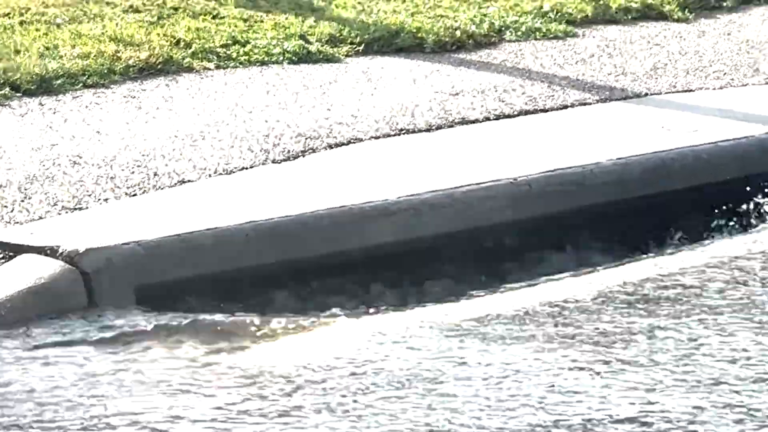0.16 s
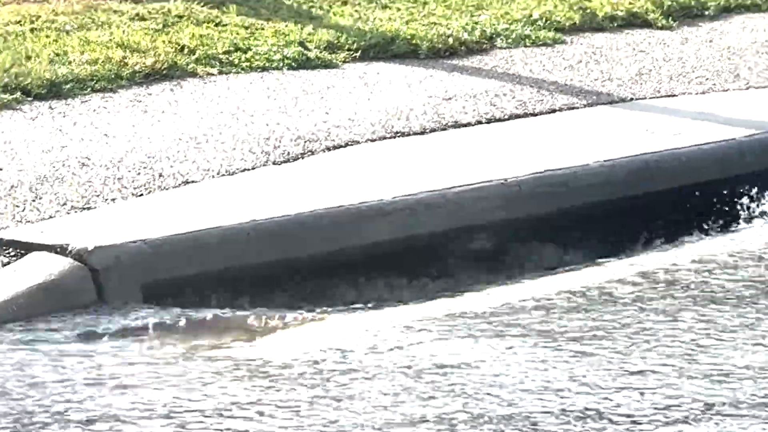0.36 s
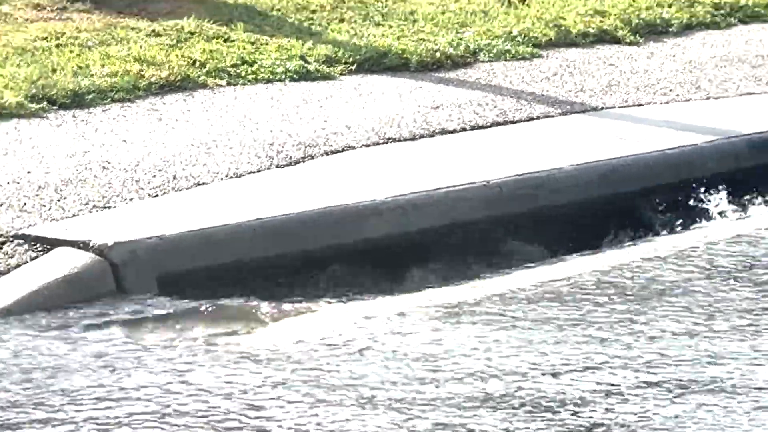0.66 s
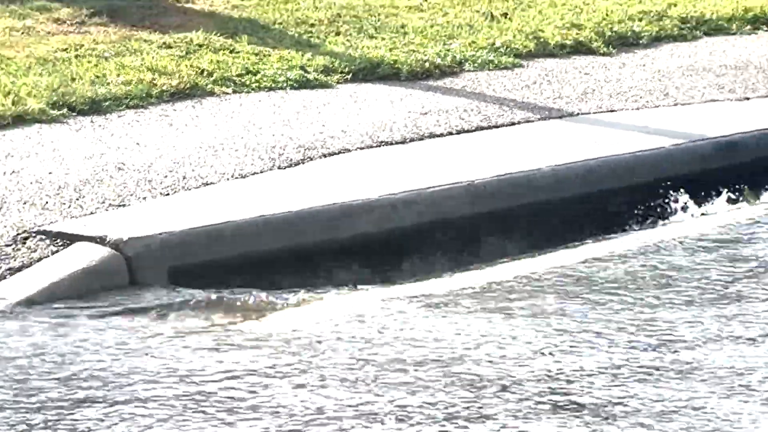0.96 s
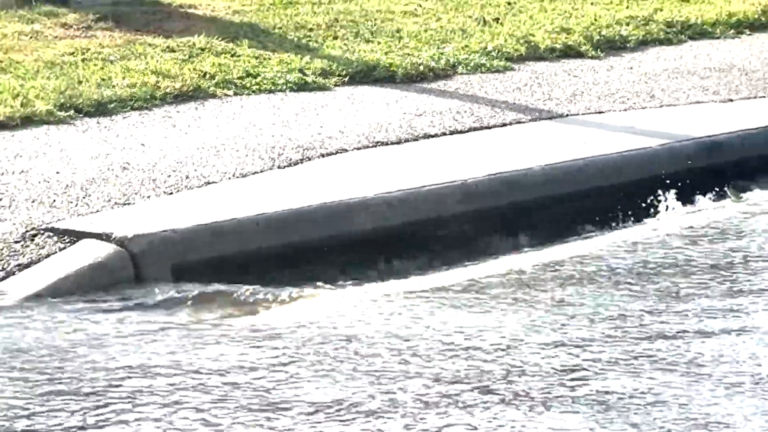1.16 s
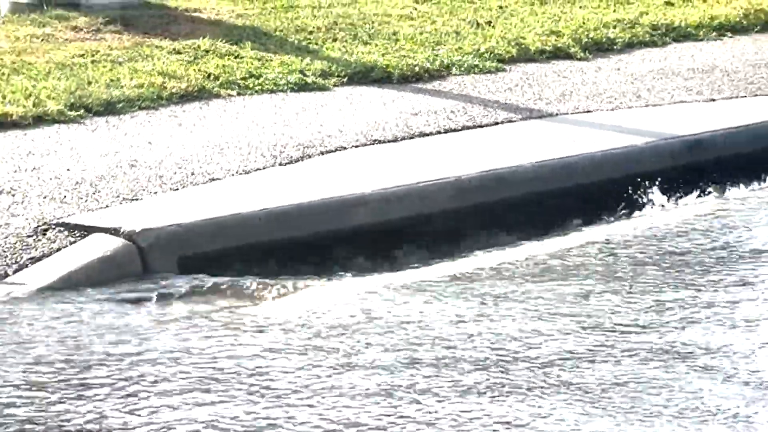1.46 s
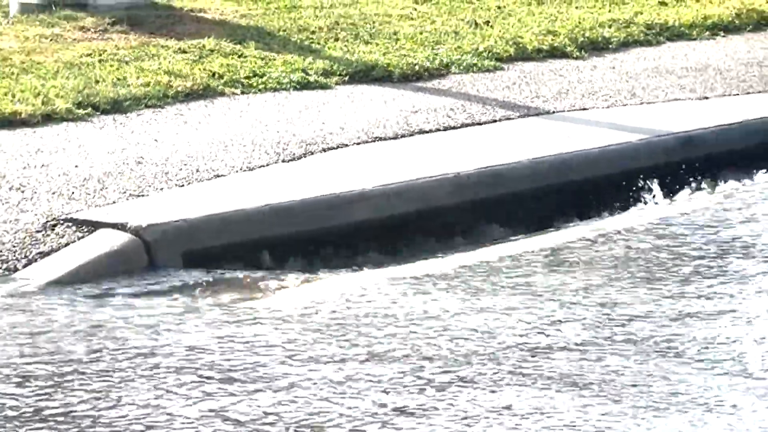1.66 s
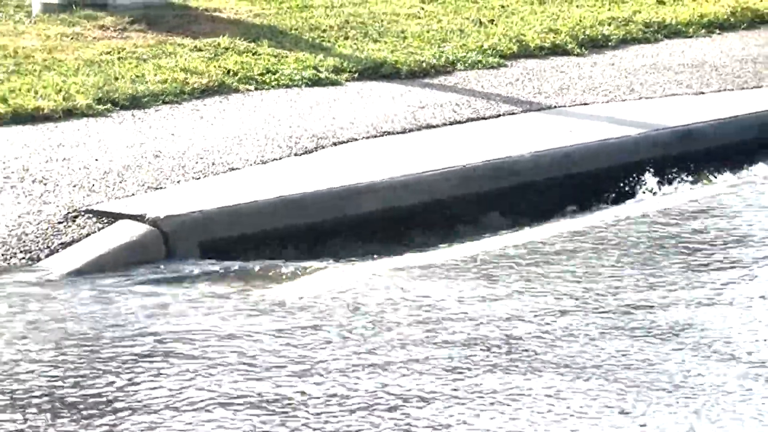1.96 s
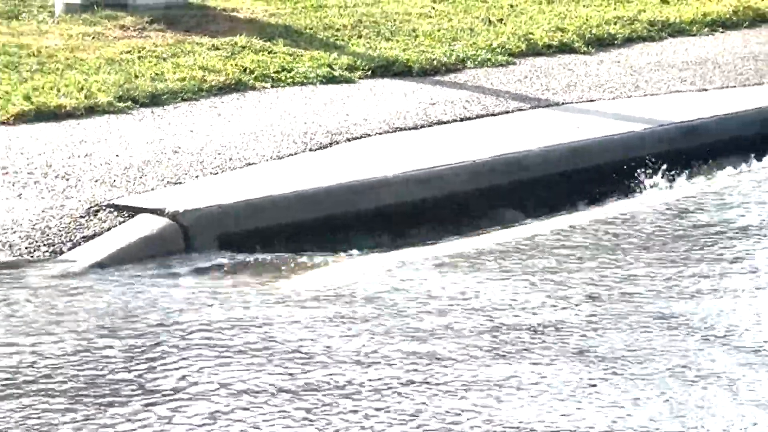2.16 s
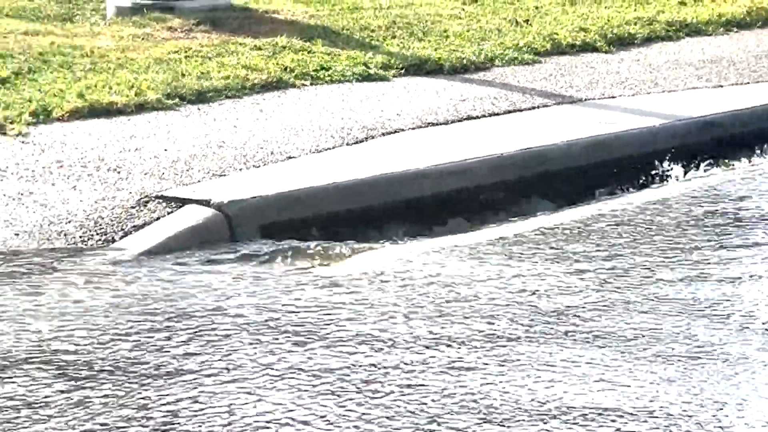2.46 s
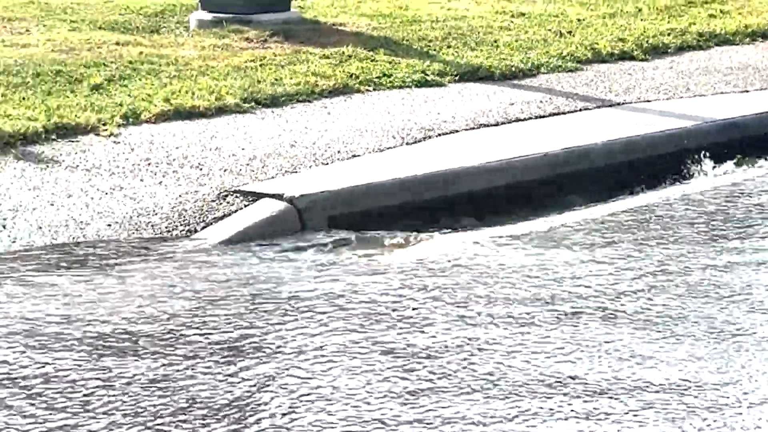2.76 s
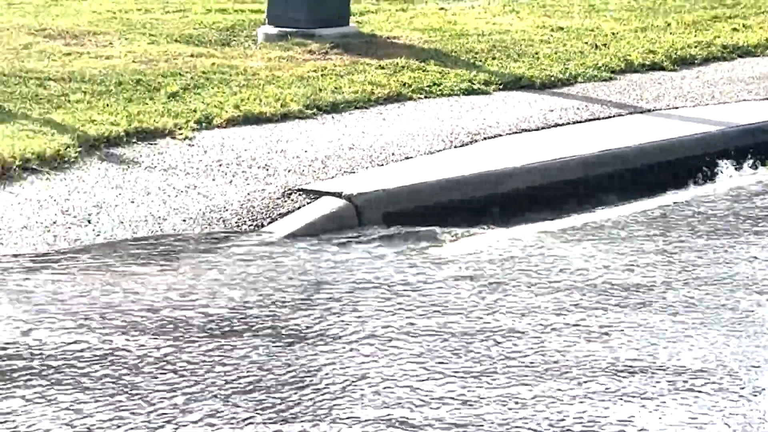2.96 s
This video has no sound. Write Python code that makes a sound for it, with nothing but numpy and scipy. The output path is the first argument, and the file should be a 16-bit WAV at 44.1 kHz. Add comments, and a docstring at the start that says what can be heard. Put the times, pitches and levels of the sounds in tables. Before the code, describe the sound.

Water rushing into a street drain, with splashes, gulps and a deep boom underneath.

```python
"""A patchy roar of floodwater pouring over a kerb into a storm drain, full of bubbles and spray. Air pockets
close with louder gulps, and waves slap down as splashes. The concrete chamber booms as its air rings, masses of
water thud in it, and deep steady hums lie under it all. A puff of wind comes at the end. Two close microphone
openings (ports) pick up the scene. Left and right are almost alike in the low and middle sounds, and in the
highest treble they are in opposite phase: one swings up as the other swings down."""
import sys
import numpy as np
from scipy import signal
from scipy.fft import rfft, irfft, next_fast_len
from scipy.io import wavfile
from scipy.ndimage import uniform_filter1d, map_coordinates

SR = 44100
rng = np.random.default_rng(int(sys.argv[2]) if len(sys.argv) > 2 else 0)


def wrap_up_sound(samples):
    """Save the sound to the file named by the first command line argument, as 16-bit audio."""
    columns = np.atleast_2d(samples).T
    # keep every value between -1 and 1, then stretch to whole-number steps
    tamed = np.clip(columns, -1, 1)
    steps = np.round(tamed * 32767).astype(np.int16)
    wavfile.write(sys.argv[1], SR, steps)


N = 136710

# How strongly the water flows: t/s, relative roar level/dB, relative spray level/dB
FLOW_LEVELS = [(0.0, -44, -57), (0.76, -43, -54.5), (2.2, -43.5, -55), (2.49, -43.5, -55.5),
               (2.74, -43.5, -54), (3.1, -44, -55.5)]
# Tone of the roar in the sum of the two ports: f/Hz, relative level/dB
ROAR_TONE = [(45, -3), (88, -32.5), (150, -1), (250, -8.5), (400, -8), (500, -8), (705, -12), (1200, -15),
             (1950, -18), (2520, -23.5), (3500, -27), (4600, -30.5), (5300, -55)]
# Roar in the difference of the ports: f/Hz, level against the sum/dB
ROAR_DIFFERENCE = [(90, -43), (170, -34), (300, -13.5), (800, -15), (1300, -21), (1400, -56)]
# Tone of the spray in the sum of the ports: f/Hz, relative level/dB
SPRAY_TONE = [(2500, -42), (4700, -5), (4950, -3.5), (5400, 0.5), (6800, 1), (8500, -1), (9800, -6.5),
              (10400, -9.5), (10750, -39), (13900, -51), (14300, -10), (15000, -9)]
# Spray in the difference of the ports: f/Hz, level/dB on the same scale as SPRAY_TONE
SPRAY_DIFFERENCE = [(4500, -64), (4700, -4.5), (4950, -7), (5150, -4), (5300, -62), (6200, -38),
                    (6400, -21), (7000, -6), (8500, -2), (11400, -4.5), (15000, -5)]
# Big air pockets: t/s, peak level/dB, starting f/Hz, life/cycles, glide (above 0 the pitch rises)
AIR_POCKETS = [(.18, -30.5, 450, 1.7, 0.082), (.189, -34, 596, 3.1, -0.041), (.206, -31.5, 880, 17, 0.17),
               (.207, -33, 1870, 10.4, 0.097), (.211, -42, 3000, 13, -0.04), (.211, -44, 6300, 25, -0.032),
               (0.766, -50, 526, 2.8, 0.045), (1.172, -44, 810, 9, 0.02), (1.198, -23, 710, 6.1, -0.24),
               (1.198, -34, 1630, 5.6, -0.019), (1.208, -40, 500, 2.5, -0.12),
               (1.245, -36.5, 1320, 14, -0.18), (1.246, -36, 520, 5.5, -0.016),
               (1.271, -33, 590, 5.5, 0.061), (1.273, -35, 422, 2.4, 0.15),
               (1.765, -34.5, 468, 5.2, -0.066), (2.008, -35.5, 1590, 7.7, -0.22),
               (2.131, -38, 1150, 8.5, -0.03), (2.146, -42, 1150, 5.5, 0), (2.148, -35, 690, 6.2, 0),
               (2.301, -34, 433, 6.1, 0), (2.358, -34, 500, 4.7, 0.026), (2.537, -39.5, 470, 6, -0.05),
               (2.683, -36, 1300, 6, -0.17), (2.71, -31, 560, 3.7, 0.048), (2.725, -32.5, 610, 5.4, -0.062),
               (2.751, -39.5, 1000, 7, -0.014), (2.761, -41, 1140, 12, 0.0043),
               (2.763, -32.5, 520, 7.1, -0.075), (2.923, -34, 570, 4.3, -0.16),
               (2.931, -39, 1050, 9.6, -0.015), (3.028, -35.5, 636, 6.3, -0.2)]
# Waves slapping down: t/s, peak spray boost/dB, peak roar boost/dB, length/s
WAVE_SLAPS = [(0.205, 10.5, 3.5, 0.009), (0.228, 4.5, -0.2, 0.05), (0.433, 4.5, -1.5, 0.0098),
              (0.763, 1, 0.5, 0.055), (1.437, 2.5, 1.5, 0.005), (1.489, 3.5, 0, 0.0086),
              (1.654, 4, -2.5, 0.006), (2.005, 8, 4, 0.0069), (2.068, 5.5, 1, .006), (2.12, 5, 0.5, .007),
              (2.159, 5.5, -5, 0.0041), (2.689, 2.5, 2, .007), (2.698, 4.5, 2, 0.006)]
# Loudness of the chamber's boom: t/s, level/dB
BOOM_LEVELS = [(0, -38.5), (.6, -42), (1.3, -41), (2, -40.5), (2.55, -40), (2.75, -36.5), (3.0, -39),
               (3.1, -47.5)]
# Pitches at which the chamber's air rings: f/Hz, width/Hz, relative level/dB
AIR_RESONANCES = [(52.8, 13.4, -3.5), (71.3, 5.3, 5), (83.2, 15, -0.5), (114.3, 8.4, 4), (135.75, 4, 1.5),
                  (177.2, 25, -13.5)]
# Masses of water thudding: t/s, f/Hz, peak level/dB
WATER_THUDS = [(2.69, 53, -26.5), (2.975, 71, -24.5), (2.1, 107, -27)]
# Deep steady tones: f/Hz, level/dB, pitch waver/Hz, level waver/dB
HUM_TONES = [(37.3, -42.5, 0.65, -1.5), (83.8, -49.5, 1.49, 4), (114.3, -52.5, 2.64, -0.5),
             (135.7, -47.5, 1.096, 1.3)]
# Strength of the wind on the ports: t/s, level/dB
WIND_LEVELS = [(0, -88), (2.7, -83), (2.8, -53), (2.87, -82), (2.93, -48.5), (3.1, -58)]
# Tone of the wind: f/Hz, relative level/dB
WIND_TONE = [(40, -24), (90, -9), (130, 8), (220, 7), (400, -20)]


def roar(level_db, splash_gain):
    """Churning water is noise plus ringing bubbles; gives the sum and difference of the ports."""
    pair = patchy_noise(patchy_db=1.18)
    pair[0] += amp(-13.5) * swarm(900, 234, 4270, tilt=0.48, spread_db=11, cycles=4.6, samples=1200)
    pair *= splash_gain * amp(0.18 * wobble(8.82) + 0.16 * wobble(30.52))
    pair[1] *= amp(2.2 * wobble(23.12))  # the difference flickers more
    pair = filtered(pair, lambda hz: gain_at(ROAR_TONE, hz))
    pair[1] = filtered(pair[1], lambda hz: gain_at(ROAR_DIFFERENCE, hz))
    return amp(level_db + 2) * pair / np.std(pair[0])


def spray(level_db, splash_gain, shared=0.52):
    """Fine droplets hiss and tick; gives the sum and difference of the ports."""
    hiss = patchy_noise(patchy_db=1.45)
    hiss[0] += amp(-11) * swarm(3000, 2880, 13840, tilt=0.34, spread_db=24.5, cycles=6.3, samples=100)
    hiss *= splash_gain * amp(0.36 * wobble(8.31) + 0.47 * wobble(25.65))
    both = filtered(hiss[0], lambda hz: gain_at(SPRAY_TONE, hz))
    # The shared part of the difference is the same spray, a quarter cycle late (-1j).
    blend = np.array([[-1j * np.sqrt(shared)], [np.sqrt(1 - shared)]])
    apart = filtered(hiss, lambda hz: gain_at(SPRAY_DIFFERENCE, hz) * blend).sum(0)
    return amp(level_db - 3) * np.array([both, apart]) / np.std(both)


def gulps(rough_db=1.2, echo_db=-12, echo_fade_s=0.13):
    """Each big air pocket closes and rings as one rough bubble; the chamber adds a short echo."""
    start_s, db, hz, cycles, glide = np.transpose(AIR_POCKETS)
    rings = bubbles(start_s, hz, amp(db), cycles[:, None], glide[:, None], samples=2500)
    rings *= amp(rough_db * wobble(350))
    tail = rng.standard_normal(SR // 4) * amp(-60 * np.arange(SR // 4) / SR / echo_fade_s)
    delayed = np.pad(rings, (250, 0))
    echo = signal.fftconvolve(delayed, tail / np.linalg.norm(tail))[:N]
    return rings + amp(echo_db) * echo


def splashes():
    """Each slapping wave briefly changes the loudness; gives one gain for spray and one for roar."""
    gains = np.ones((2, N))
    for start_s, spray_db, roar_db, length_s in WAVE_SLAPS:
        age = np.clip((np.arange(N) / SR - start_s) / length_s, 0, None)
        burst = 2 * np.e * age * np.exp(-2 * age)  # peaks at 1
        gains += (amp([[spray_db], [roar_db]]) - 1) * burst
    return gains


def boom():
    """Noise makes the air in the concrete chamber ring at its own low pitches."""
    def resonances(hz):
        return sum((-1) ** k * amp(db) * 1j * hz * width / (pitch ** 2 - hz ** 2 + 1j * hz * width)
                   for k, (pitch, width, db) in enumerate(AIR_RESONANCES))
    return amp(curves(BOOM_LEVELS)[0]) * unit(filtered(rng.standard_normal(N), resonances))


def thuds():
    """Masses of water thud in the chamber, each a low tone that dies almost at once."""
    start_s, hz, db = np.transpose(WATER_THUDS)
    return bubbles(start_s, hz, amp(db), cycles=2, glide=0, samples=8000)


def hums():
    """Deep tones hold on throughout, wavering in pitch and loudness."""
    sound = np.zeros(N)
    for hz, db, waver_hz, waver_db in HUM_TONES:
        gain = np.sqrt(2) * amp(db + waver_db * wobble(2.5))
        turns = np.cumsum(hz + waver_hz * wobble(3.003)) / SR + rng.random()
        sound += gain * np.sin(2 * np.pi * turns)
    return sound


def wind():
    """A puff of lumpy low noise that pushes the two ports in opposite ways."""
    gain = amp(curves(WIND_LEVELS)[0] + 4.6 * wobble(13))
    return gain * unit(filtered(rng.standard_normal(N), lambda hz: gain_at(WIND_TONE, hz)))


def patchy_noise(patchy_db):
    """Two separate noises that swell and dip in the same random patches of time and pitch."""
    spectra = signal.stft(rng.standard_normal((2, N)), nperseg=512)[2]
    patches = rng.standard_normal(spectra.shape[1:])
    patches = uniform_filter1d(patches, size=6, axis=0)  # smooth across pitch
    patches = uniform_filter1d(patches, size=8, axis=1)  # smooth across time
    return unit(signal.istft(spectra * amp(patchy_db * unit(patches)), nperseg=512)[1][:, :N])


def swarm(count, low_hz, high_hz, tilt, spread_db, cycles, samples):
    """A random crowd of weak and strong bubbles; tilt favours the high ones."""
    when, pitch, luck = rng.random((count, 3)).T
    hz = low_hz * (high_hz / low_hz) ** pitch
    peak = (hz / low_hz) ** tilt * amp(spread_db * luck ** 2)
    return unit(bubbles(when * N / SR, hz, peak, cycles, glide=0.17, samples=samples))


def bubbles(start_s, hz, peak, cycles, glide, samples):
    """Each bubble is a tone that starts softly, slides in pitch and dies away."""
    t = np.arange(samples) / SR
    age = t * hz[:, None] / cycles
    envelope = np.sqrt(8 * np.e) * age * np.exp(-4 * age * age)  # peaks at 1
    rings = peak[:, None] * envelope * np.sin(2 * np.pi * hz[:, None] * t * (1 + glide * age))
    places = (start_s * SR).astype(int)[:, None] + np.arange(samples)
    return np.bincount(places.ravel(), rings.ravel(), N + samples)[:N]


def amp(db):
    """Turn decibels into a gain to multiply by."""
    return 10 ** (np.asarray(db) / 20)


def unit(x):
    """Scale a signal to an average strength (rms) of 1."""
    return x / np.sqrt(np.mean(x ** 2) + 1e-20)


def gain_at(points, hz):
    """Read the gain at hz from a table of f/Hz, level/dB; silent beyond its ends."""
    f, db = np.transpose(points)
    return amp(np.interp(np.log(hz + 1), np.log(f + 1), db, left=-120, right=-120))


def curves(rows):
    """Join a table's points over time with straight lines, one curve for each level column."""
    times, *columns = np.transpose(rows)
    return [np.interp(np.arange(N) / SR, times, column) for column in columns]


def wobble(rate):
    """A smooth curve through random points, rate of them a second."""
    return map_coordinates(rng.standard_normal(int(N * rate / SR) + 4), [np.arange(N) * rate / SR])


def filtered(x, response):
    """Change the strength and phase of each frequency in x by response(hz)."""
    size = next_fast_len(N + SR // 2)
    return irfft(rfft(x, size) * response(np.fft.rfftfreq(size, 1 / SR)), size)[..., :N]


def scene():
    """Mix the sources as the sum (both) and difference (apart) of the ports, then form left and right."""
    roar_db, spray_db = curves(FLOW_LEVELS)
    spray_gain, roar_gain = splashes()
    both, apart = roar(roar_db, roar_gain) + spray(spray_db, spray_gain)
    both += boom() + thuds() + hums() + gulps()
    apart += wind()
    return np.array([both + apart, both - apart])


def record(dry, low_cut_hz=12, top_hz=15020):
    """The microphones lose the deepest bass, and the camera keeps nothing above top_hz."""
    return filtered(dry, lambda hz: (hz < top_hz) / np.sqrt(1 + (low_cut_hz / (hz + 1)) ** 12))


dry = scene()
out = record(dry)
wrap_up_sound(out)
```